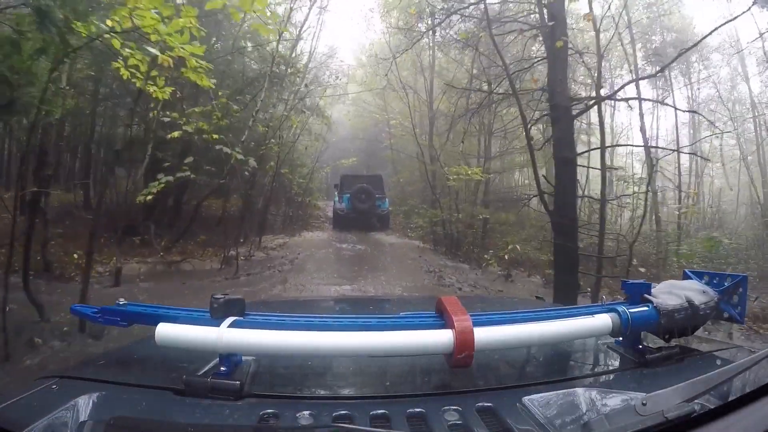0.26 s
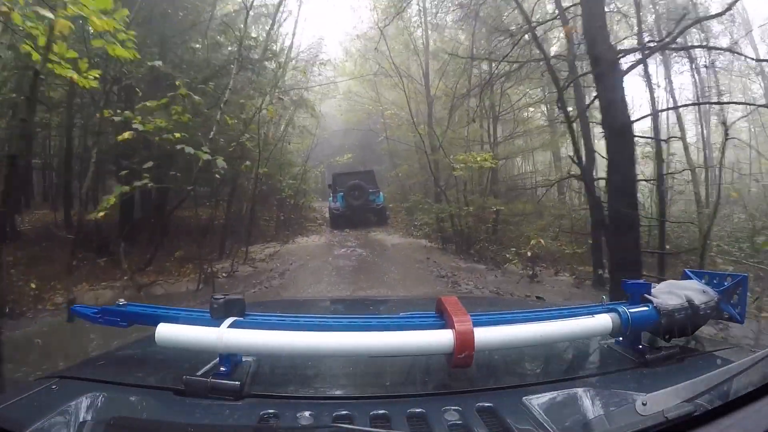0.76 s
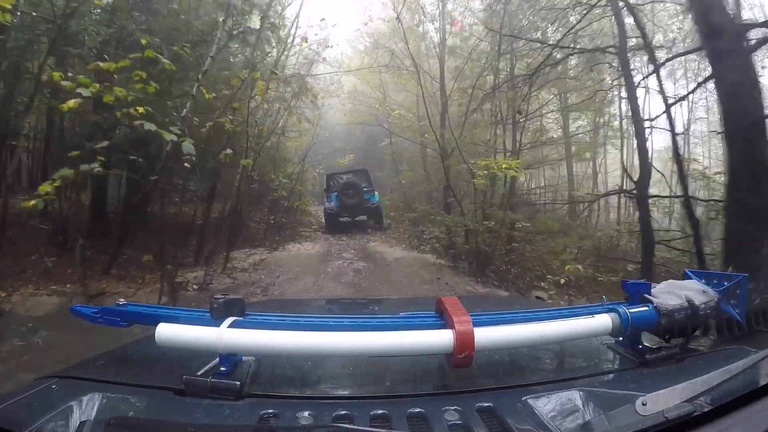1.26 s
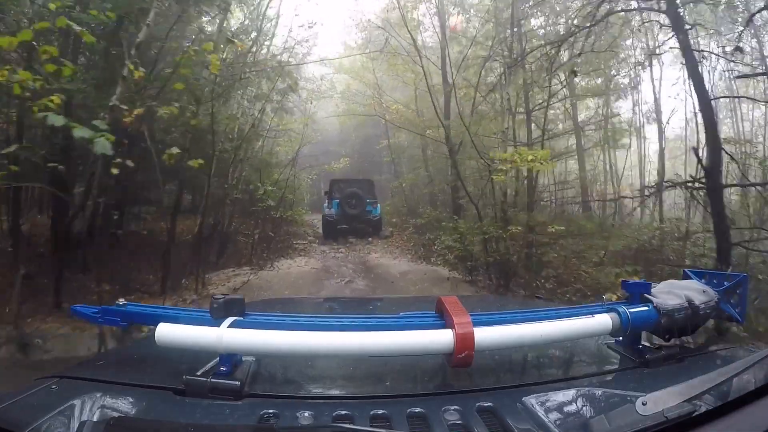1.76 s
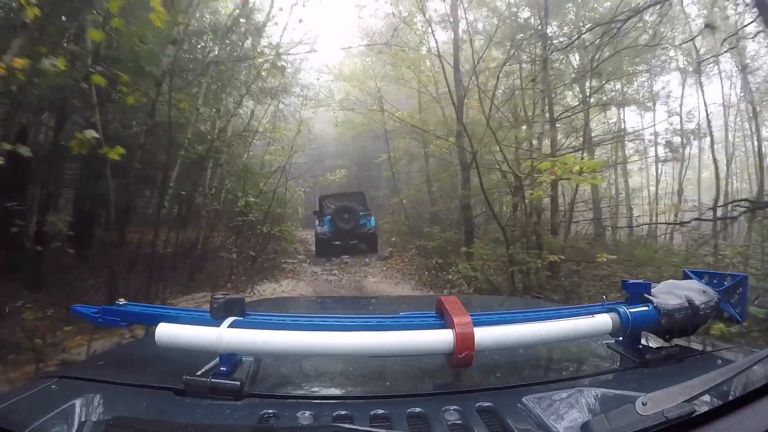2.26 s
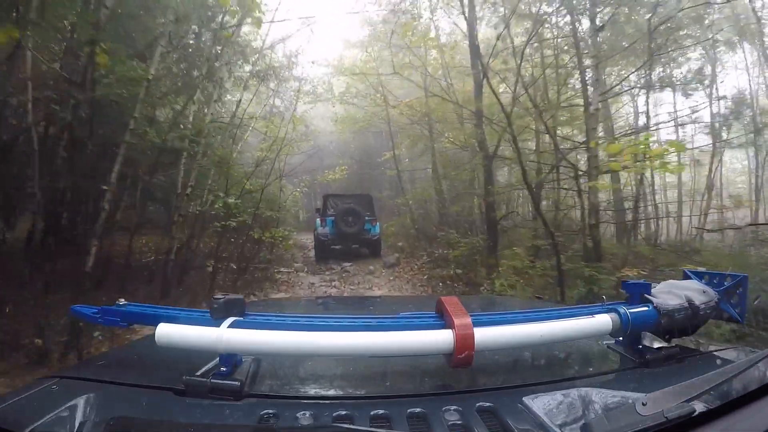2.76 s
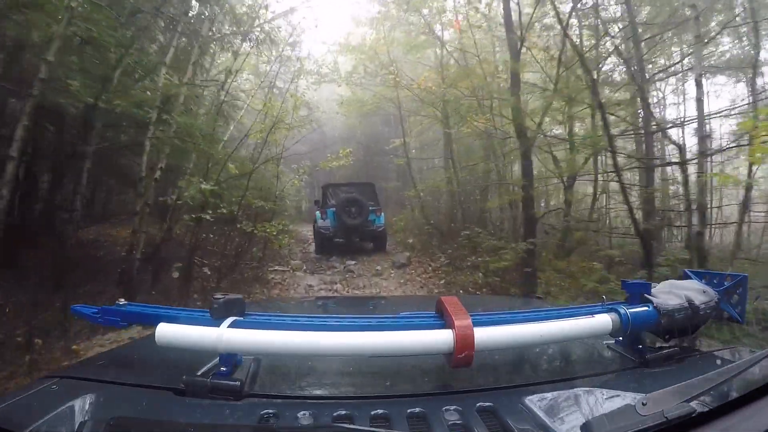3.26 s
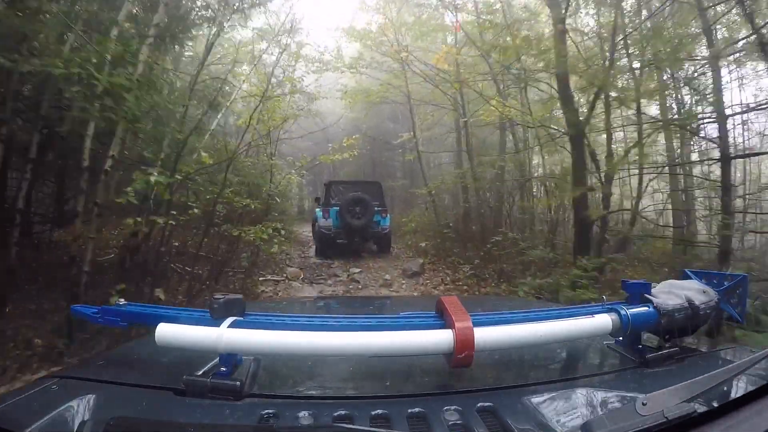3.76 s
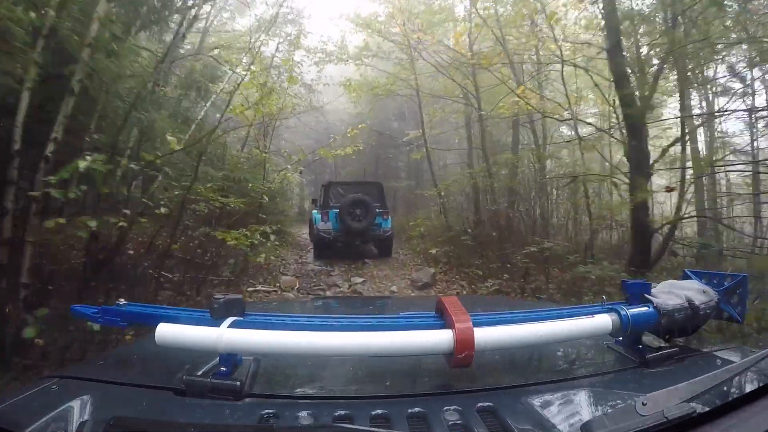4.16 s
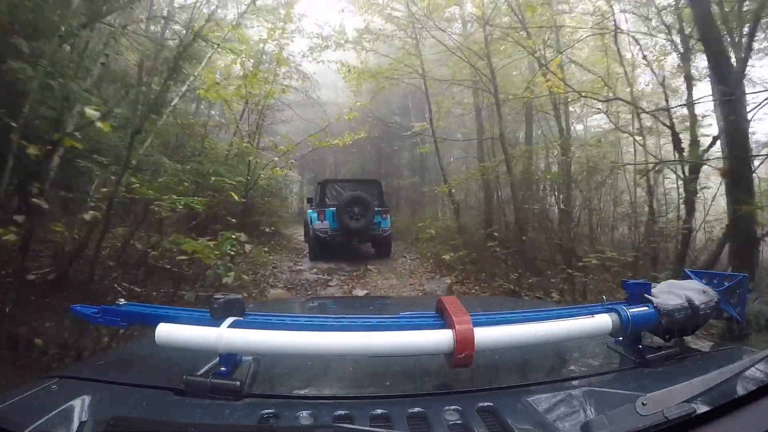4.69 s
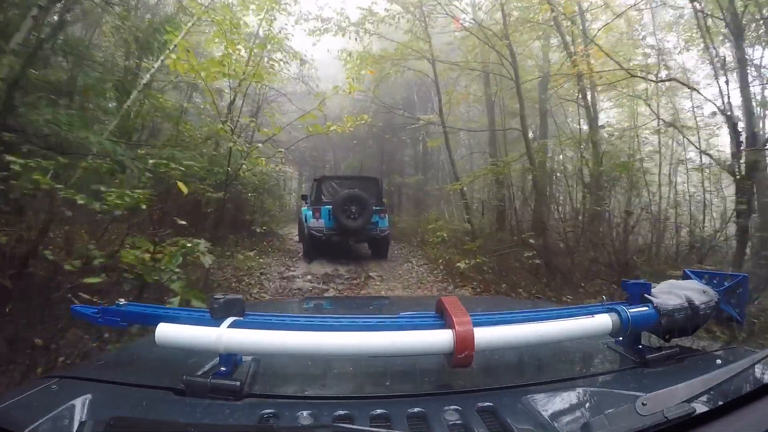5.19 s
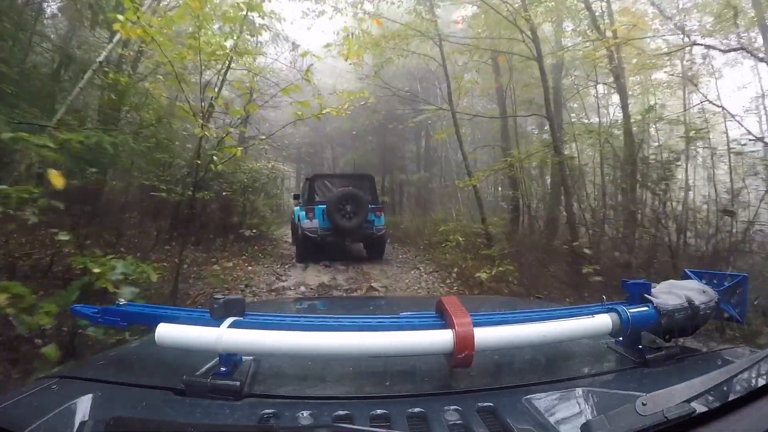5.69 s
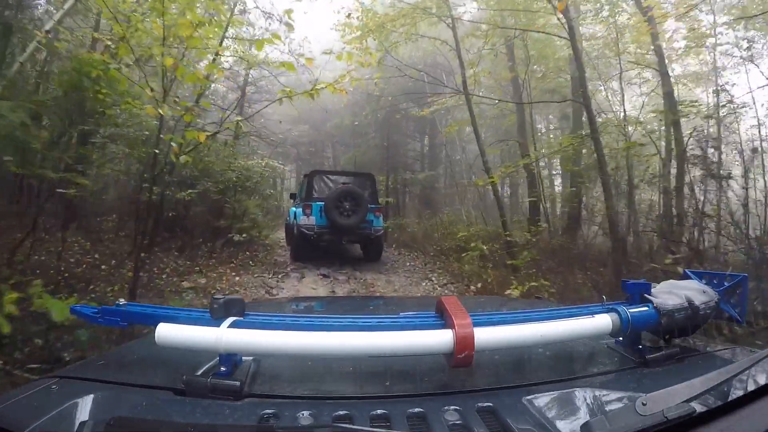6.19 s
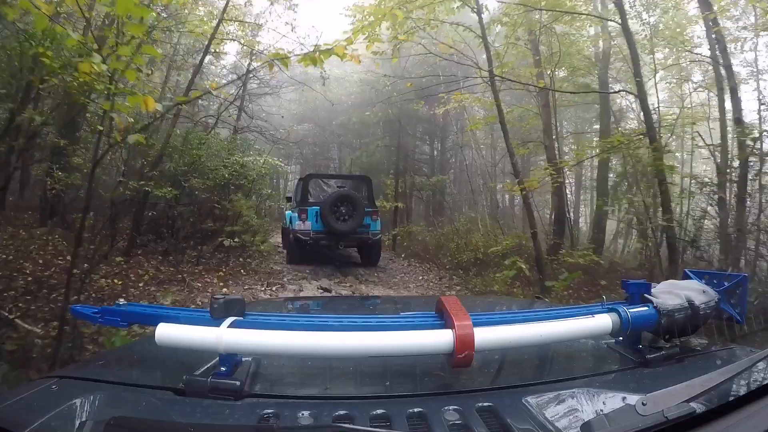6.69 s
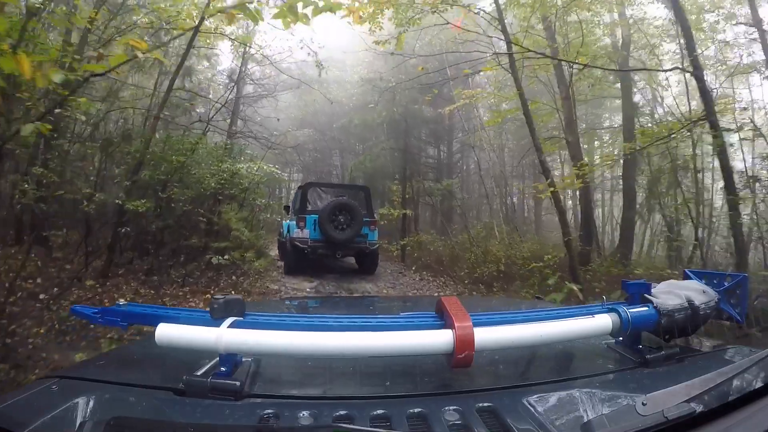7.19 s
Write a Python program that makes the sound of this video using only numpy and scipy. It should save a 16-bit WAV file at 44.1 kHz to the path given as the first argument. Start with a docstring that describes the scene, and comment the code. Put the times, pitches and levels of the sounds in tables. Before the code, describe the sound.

From behind the bonnet, an off-road vehicle wades along a flooded woodland trail. A strong low buffet, a splash and a stone knock open the scene. From 0 to 2 seconds, tyres churn thick bubbling water in uneven slaps with fine hissing spray, growing steadily; a short surge comes at 0.7. Splashing peaks around 2.3 to 2.5 with deep watery gulps, holding until about 3.4. The low engine note rises towards 2 while becoming faint, then returns strongly near 3.3, falling in pitch as the driver lifts off. From 3.5 to 5 the water thins into quiet puddle splashes, with a tick and knock near 4.1 and a splash at 4.7. Around 5.8 to 6.5 come a small splash, brushing wet leaves, stone knocks and light ticks. The water is quietest after 7, with one last knock. Tyre rumble, a faint steady hum and easing deep air buffeting run throughout.

```python
"""Tyres of an off-road vehicle wade through a flooded forest trail, heard from behind the bonnet.
Filtered noise and showers of ringing drops make the churn, splash and spray, with gulps, knocks and ticks.
The vehicle rolls on into shallow puddles over wet stones and leaves as the driver lifts off.
Beneath lie the engine's firing note in sine overtones, a wavering hum, and noise bands for tyre rumble
and the buffeting of air and bodywork."""
import sys
import numpy as np
from scipy import signal
from scipy.fft import rfft, irfft, next_fast_len
from scipy.io import wavfile
from scipy.ndimage import uniform_filter1d

SR = 44100
rng = np.random.default_rng(int(sys.argv[2]) if len(sys.argv) > 2 else 0)


def log_audio(samples):
    """Write samples as a 16-bit WAV file to the path given in sys.argv[1]."""
    # one column per channel
    frames = np.atleast_2d(samples).T
    # limit to full scale, then quantise
    limited = np.clip(frames, -1, 1)
    pcm = np.round(limited * 32767).astype(np.int16)
    wavfile.write(sys.argv[1], SR, pcm)


N = 328104
T = np.arange(N) / SR

# resonances and dips of bonnet and windscreen, on churn and splash: centre_hz, width_hz, height_db
BONNET_MODES = [(454, 41, 2.5), (523, 25, 4), (625, 67, -4.5), (737, 120, 4), (870, 59, 2.5), (1123, 19, 5),
                (1330, 74, -1.5), (1510, 84, 1.5), (1680, 42, -2.5), (1930, 92, 1.5), (2160, 92, 1),
                (2330, 120, -1), (2550, 83, 1)]


def amp(db):
    """Decibels to gain."""
    return 10 ** (np.asarray(db) / 20)


def unit(x):
    """Scales to rms 1."""
    return x / np.sqrt(np.mean(x ** 2) + 1e-20)


def curves(rows):
    """Each column of a table, joined by straight lines in time."""
    s, *columns = np.transpose(rows)
    return [np.interp(T, s, c) for c in columns]


def swell(s, half_s):
    """A smooth bell that peaks at 1 at time s and is down to 1/e half_s away."""
    return np.exp(-((T - s) / half_s) ** 2)


def drift(rate_hz):
    """Smooth random wander at rms 1, mostly slower than the rate."""
    hz = np.fft.rfftfreq(N, 1 / SR)
    slow = np.exp(-(hz / rate_hz) ** 2) * (hz > 0)
    return unit(irfft(rfft(rng.standard_normal(N)) * slow, N))


def colour(x, points, bumps=()):
    """Gives x a spectrum with optional peaks and dips, at rms 1."""
    size = next_fast_len(N)
    hz = np.fft.rfftfreq(size, 1 / SR)
    f, db = np.transpose(points)
    shape_db = np.interp(np.log(hz + 1), np.log(f + 1), db)
    for centre, width, height in bumps:
        shape_db = shape_db + height / (1 + (2 * (hz - centre) / width) ** 2)
    return unit(irfft(rfft(x, size) * amp(shape_db), size)[:N])


def firm(x, size):
    """Evens out the slow swells of x, keeping its irregular swings."""
    power = uniform_filter1d(abs(signal.hilbert(x)) ** 2, size=size)
    return unit(x / np.sqrt(power + 1e-12))


def drops(per_s, spread_db, low_hz, high_hz, cycles, count=32):
    """Showers of short rings of uneven size, each rising in pitch as a bubble does."""
    out = np.zeros(N + SR)
    for hz in np.geomspace(low_hz, high_hz, count):
        when, size, chance = rng.random((1024, 3)).T
        falls = chance < per_s * N / SR / count / len(chance)
        size = amp(spread_db * np.minimum(-np.log(size[falls] + 1e-12), 3))
        u = np.arange(0, 1, hz / (cycles * SR))  # 0-1 through one ring
        tone = np.sin(2 * np.pi * cycles * u * (1 + 0.12 * u))
        ring = np.sqrt(hz) * tone * np.exp(-5 * u)
        at = (when[falls] * N).astype(int)[:, None] + np.arange(len(u))
        out += np.bincount(at.ravel(), np.outer(size, ring).ravel(), len(out))
    return unit(out[:N] - out.mean())


def wash(grains, share):
    """Separate grains in the smooth noise of countless smaller ones; share is the grains' power, 0-1."""
    share = np.clip(share, 0, 1)
    return np.sqrt(share) * grains + np.sqrt(1 - share) * rng.standard_normal(N)


def slosh(x, depth_db, span_hz, span_s):
    """Separate slaps of water: short random patches of level in time and pitch."""
    z = signal.stft(x, nperseg=512, noverlap=384)[2]
    frames = max(1, round(span_s * SR / 128))
    bins = max(1, round(span_hz * 512 / SR))
    patches = uniform_filter1d(rng.standard_normal(z.T.shape), frames, 0)
    patches = uniform_filter1d(patches, bins, 1)
    return signal.istft(z * amp(depth_db * unit(patches).T), nperseg=512, noverlap=384)[1][:N]


def water():
    """Tyres churn bubbles into the water, splash it about and throw a fine spray."""
    depth = standing_depth()
    splash_db = wading_level() + surges()
    sheets = drift(rate_hz=27)  # the tread flings water in uneven sheets
    return churn(splash_db, depth, sheets) + splash(splash_db, depth, sheets) + spray(splash_db, depth, sheets)


def standing_depth():
    """How deep the tyres stand in water, which sets the balance of the water layers."""
    # start_s, depth (0-1)
    depths = [(0, 0.95), (1.5, 1), (3.3, 0.93), (4.4, 0.38), (5, 0.07), (6, 0.08), (7.44, 0.3)]
    return curves(depths)[0]


def wading_level():
    """How hard the tyres splash as the vehicle wades on."""
    # start_s, level_db
    wading = [(0, -40), (.6, -39), (1.5, -35.5), (2.3, -33), (2.65, -34.5), (3.35, -35), (3.9, -39.5),
              (4.35, -40.5), (4.95, -45), (5.4, -45.5), (5.75, -44), (6.75, -47), (7.05, -51.5),
              (7.44, -50.5)]
    return curves(wading)[0]


def surges():
    """A wheel in a rut briefly alters the thrown water, mostly upwards: a rise, then a quicker fall."""
    # peak_s, extra_db
    ruts = [(.02, 1.5), (.71, 2), (1.62, 0.8), (2.33, 1), (2.44, 1.5), (3.4, 2.5), (4.38, 1), (4.57, -1),
            (4.71, 2.5), (5.87, 3.5), (6, 3.2), (6.2, 1), (7.21, 1.5)]
    rise_s, fall_s = 0.031, 0.013  # time constants
    return sum(db * np.exp(-np.maximum((s - T) / rise_s, (T - s) / fall_s)) for s, db in ruts)


def churn(splash_db, depth, sheets):
    """Low bubbling: it follows the splashing by a share of its dB and fades in the shallows."""
    # spectrum of churned water: pitch_hz, level_db (per Hz)
    churn_colour = [(70, -32), (120, -2), (190, 0.5), (270, 1.5), (450, -0.7), (520, -1), (740, -5),
                    (950, -8), (1400, -23.5), (3000, -30)]
    offset_db, follows, shallow_db = -6, 0.73, -5.5
    level_db = offset_db + follows * splash_db + shallow_db * (1 - depth)
    bubbles = drops(per_s=170, spread_db=1.5, low_hz=301.5, high_hz=1636, cycles=53.3, count=48)
    body = slosh(wash(bubbles, share=0.015), depth_db=0.94, span_hz=250, span_s=.05)
    return amp(level_db + 0.64 * sheets) * colour(body, churn_colour, BONNET_MODES)


def splash(splash_db, depth, sheets):
    """Splats of mid pitch, crossing from deep water to puddles at equal power as the depth falls."""
    # spectrum of splashing in deep water: pitch_hz, level_db (per Hz)
    deep_colour = [(400, -20), (800, -4.5), (1130, -2), (1500, -3.5), (1900, -6.5), (2250, -9.5),
                   (2700, -8.5), (3300, -10), (4400, -12.5), (5500, -23), (8000, -47), (15000, -41)]
    # spectrum of splashing in shallow puddles: pitch_hz, level_db (per Hz)
    puddle_colour = [(350, -38), (520, -23), (750, -5), (1130, 1.5), (1600, -2.5), (1900, -3.5), (2300, -7),
                     (3400, -7.5), (4400, -10), (5500, -25), (8000, -24), (15000, -42)]
    splats = drops(per_s=800, spread_db=2.5, low_hz=898, high_hz=5870, cycles=49.4, count=64)
    deep = slosh(wash(splats, share=0.035), depth_db=0.48, span_hz=600, span_s=0.033)
    other_splats = np.roll(splats, N // 2)  # the same shower, shifted by half the scene
    puddles = slosh(wash(other_splats, drop_share(depth) * 0.36), depth_db=1.0, span_hz=700, span_s=0.033)
    blend = np.sqrt(depth) * colour(deep, deep_colour, BONNET_MODES)
    blend += np.sqrt(1 - depth) * colour(puddles, puddle_colour, BONNET_MODES)
    return amp(splash_db + 0.42 * sheets) * blend


def spray(splash_db, depth, sheets):
    """Fine hiss that grows faster than the splashing; wet leaves brush past and add to it."""
    # spectrum of fine spray: pitch_hz, level_db (per Hz)
    spray_colour = [(2500, -34), (4500, -0.5), (6000, 0), (7500, -1.5), (9500, -4), (12000, -6.5),
                    (15000, -18)]
    usual_db = -40  # splash level at which the offset holds
    offset_db, follows, shallow_db = -10.5, 1.2, 0.5
    level_db = usual_db + offset_db + follows * (splash_db - usual_db) + shallow_db * (1 - depth)
    leaves_db = 2.5 * swell(6.22, half_s=0.27)
    grit = drops(per_s=2200, spread_db=-2.5, low_hz=4000, high_hz=14170, cycles=30)
    hiss = slosh(wash(grit, drop_share(depth)), depth_db=0.57, span_hz=1200, span_s=0.046)
    return amp(level_db + leaves_db + 0.61 * sheets) * colour(hiss, spray_colour)


def drop_share(depth):
    """Power share of single drops, which stand out more in the shallows."""
    return .3 - 0.19 * depth


def gulps():
    """Pockets of air and water in puddles and wheel wells resonate briefly, swelling and fading."""
    # middle_s, level_db (rms at the crest is 6.5 dB lower), centre_hz, half_width_hz, half_length_s
    sloshes = [(0.028, -35, 262, 120, .04), (0.726, -29, 474, 200, 0.043), (1.6, -29, 186, 25.4, 0.085),
               (2.11, -26.5, 123, 30, 0.061), (2.33, -29, 135, 30.6, 0.13), (2.34, -36, 2940, 1015, 0.1),
               (2.437, -29, 785, 160, 0.027), (3.051, -28.5, 172, 25.2, 0.06), (4.708, -41, 3460, 800, .07),
               (5.086, -42, 1260, 350, 0.069), (5.681, -39, 1154, 200.3, 0.1),
               (5.768, -36, 1300, 450, 0.062), (6.722, -39.5, 281, 120, 0.16),
               (6.78, -44.5, 1480, 765, .12), (6.93, -36, 137.6, 40, 0.12)]
    out, t = np.zeros(N + SR), np.arange(SR) / SR - .5
    hz = np.fft.rfftfreq(SR, 1 / SR)
    for s, db, centre, width, length in sloshes:
        band = np.exp(-2 * ((hz - centre) / width) ** 2)
        fizz = irfft(rfft(rng.standard_normal(SR)) * band)
        envelope = np.exp(-2 * (t / length) ** 2)
        out[round(s * SR):][:SR] += amp(db - 6.5) * firm(fizz, size=2000) * envelope
    return out[SR // 2:][:N]


def knocks():
    """Stones strike the underbody at different spots, so its modes ring in different shares."""
    # start_s, level_db (before each mode's own level)
    stones = [(.037, -23), (4.128, -31), (5.793, -33), (6.156, -35), (6.186, -34), (6.307, -27),
              (7.02, -32.5)]
    # ringing modes: pitch_hz, level_db (before a random share), t60_s
    underbody = [(530, -8, .05), (735, -7, .045), (905, -4.5, .045), (1120, -4.5, .045), (1480, -13, .03)]
    out, t = np.zeros(N + 4096), np.arange(4096) / SR
    attack = np.minimum(t / 0.0011, 1)
    for s, db in stones:
        for hz, mode_db, t60 in underbody:
            ring = np.sin(2 * np.pi * (hz * t + rng.random())) * np.exp(-np.log(1000) * t / t60)
            share_db = rng.uniform(-6.2, 1)
            out[round(s * SR):][:len(t)] += amp(db + mode_db + share_db) * ring * attack
    return out[:N]


def ticks():
    """Flung drops and snapping twigs: short noise bursts that start at full level and die at once."""
    # start_s, level_db (rms at the onset), centre_hz, width_octaves, decay_s (to 1/e)
    snaps = [(3.344, -37, 3970, 0.96, 0.011), (3.403, -39, 12100, 0.64, .012),
             (4.044, -33, 3995, .27, 0.0041), (4.557, -41.5, 8740, 0.22, 0.0069),
             (4.6, -44, 3930, 0.73, 0.024), (5.335, -47, 2497, 0.51, .02), (5.796, -43, 2810, .7, 0.02),
             (5.836, -51, 10000, .2, .016), (6.009, -50, 9480, .2, .016), (6.176, -41, 1708, 0.5, 0.0083),
             (6.356, -49, 6500, 0.64, 0.012), (6.41, -46, 4040, 0.96, 0.015),
             (6.447, -43.5, 3480, 0.52, .014), (6.48, -46, 4970, 0.88, 0.014),
             (6.528, -48, 6000, 0.75, 0.02), (7.188, -55, 8000, 0.57, 0.02)]
    out, t = np.zeros(N + 8192), np.arange(8192) / SR
    hz = np.fft.rfftfreq(len(t), 1 / SR) + 1
    for s, db, centre, width, decay in snaps:
        band = np.exp(-.5 * (np.log2(hz / centre) / width) ** 2)
        snap = unit(irfft(rfft(rng.standard_normal(len(t))) * band))
        out[round(s * SR):][:len(t)] += amp(db) * snap * np.exp(-t / decay)
    return out[:N]


def engine():
    """The firing note and its overtones, a little uneven from turn to turn."""
    # the driver pulls through the water, then lifts off: start_s, firing_rate_hz, exhaust_level_db
    pull = [(0, 71.9, -28.5), (1.6, 76, -31.5), (2.1, 88.6, -53), (2.65, 87.25, -32), (3.02, 75.6, -28),
            (3.33, 66.36, -20.5), (3.6, 60.66, -22.5), (3.95, 57.1, -23.5), (4.5, 52.5, -39),
            (4.85, 51.04, -32), (5.6, 52.1, -30), (6.3, 50.06, -24.5), (7.1, 47.25, -31), (7.44, 52, -22)]
    # engine orders: multiple of the firing rate, level_db
    orders = [(1, -1), (1.5, -24.5), (2, -31), (3, -29), (4, -27.5)]
    hz, db = curves(pull)
    cycles = np.cumsum(hz * (1 + 0.0048 * drift(rate_hz=10.4))) / SR
    note = np.zeros(N)
    for order, order_db in orders:
        throb_db = 2 * drift(rate_hz=8)
        note += amp(order_db + throb_db) * np.sin(2 * np.pi * (order * cycles + rng.random()))
    return amp(db) * note


def hum():
    """One steady sine line, perhaps the cooling fan, wavering slightly and creeping up in pitch."""
    start_hz, rise_hz_per_s, level_db = 132.2, .8, -49.5
    hz = start_hz + rise_hz_per_s * T
    cycles = np.cumsum(hz * (1 + 0.0048 * drift(rate_hz=12.0))) / SR
    return amp(level_db + 2.8 * drift(rate_hz=10)) * np.sqrt(2) * np.sin(2 * np.pi * cycles)


def tyre_roll():
    """Low rumble of the tyres, a touch softer in the shallows and stronger with each strong buffet."""
    # spectrum of the rumble: pitch_hz, level_db (per Hz)
    roll_colour = [(25, -31), (44, -6), (60, 2.5), (76, -4), (90, -11), (108, -18), (128, -13.5),
                   (149, -16.5), (168, -25), (250, -23.5), (500, -72)]
    usual_db, shallow_db, follows_gusts = -33, -1, 0.47
    rumble = firm(colour(rng.standard_normal(N), roll_colour + [(4000, -110)]), size=8000)
    level_db = usual_db + shallow_db * (1 - standing_depth()) + follows_gusts * gusts()
    return amp(level_db + 1 * drift(rate_hz=6)) * rumble


def buffet():
    """Air and the shaking body push on the microphone in deep swings that ease steadily over time."""
    # spectrum of the swings: pitch_hz, level_db (per Hz)
    buffet_colour = [(8, -46), (14, -1), (19, -8), (24, -2), (29, 2.5), (36, 2), (41, -5.5), (46, -4.5),
                     (60, -53), (100, -60)]
    # middles of brief dips in the buffeting: middle_s
    lulls = [.81, 2.95, 3.39, 4.331, 5.1, 5.33, 7.388]
    start_db, ease_db_per_s = -14, -0.51  # ahead of the band-pass
    swing = firm(colour(rng.standard_normal(N), buffet_colour + [(2000, -160)]), size=6000)
    lulls_db = -12 * sum(swell(s, half_s=.028) for s in lulls)
    strength = amp(start_db + ease_db_per_s * T + gusts() + lulls_db)
    band = signal.butter(6, [15, 45], "band", fs=SR, output="sos")
    return signal.sosfiltfilt(band, strength * swing)


def gusts():
    """Extra dB of the strong buffets, each a smooth bell in time."""
    # middle_s, half_length_s, extra_db
    strong_buffets = [(0.004, 0.017, 14), (0.888, 0.022, 10.5), (1.237, 0.031, 3), (1.94, 0.13, 5),
                      (2.434, 0.064, 5), (3.08, 0.026, 6), (3.603, 0.084, 2), (4.918, 0.046, 4),
                      (5.19, 0.023, 4), (5.97, .14, 4), (7, .04, 9), (7.289, 0.081, 4.5)]
    return sum(db * swell(s, half_s) for s, half_s, db in strong_buffets)


def scene():
    """Everything at one microphone."""
    tyres = water() + gulps() + knocks() + ticks()
    vehicle = engine() + hum() + tyre_roll() + buffet()
    return (tyres + vehicle)[None]


def record(dry):
    """The microphone's upper band limit, with 4 ms of fade at either end."""
    edge_hz, fade_s = 15280, .004
    fade = np.sin(np.pi / 2 * np.minimum(np.minimum(T, T[::-1]) / fade_s, 1)) ** 2
    low_pass = signal.firwin(801, edge_hz, window=("kaiser", 9), fs=SR)
    return signal.oaconvolve(dry * fade, low_pass[None], "same")


dry = scene()
out = record(dry)
log_audio(out)
```